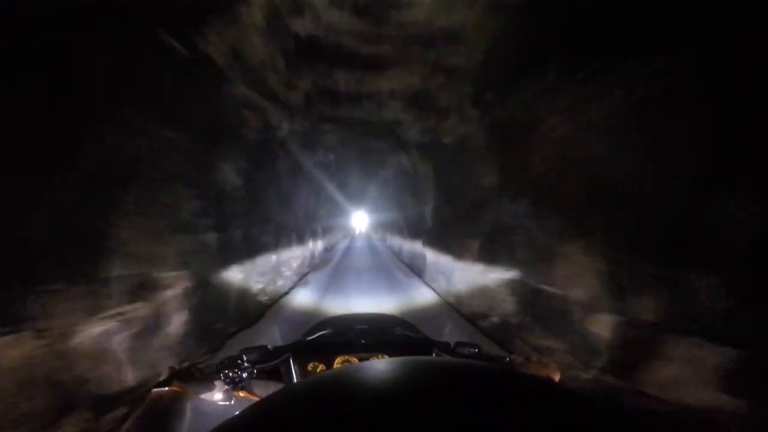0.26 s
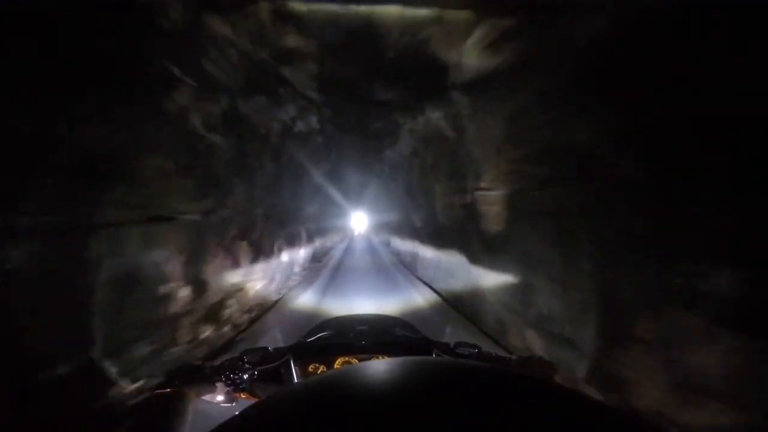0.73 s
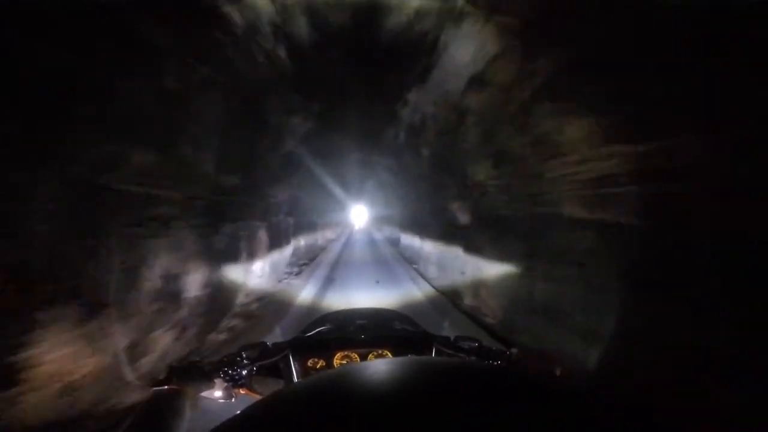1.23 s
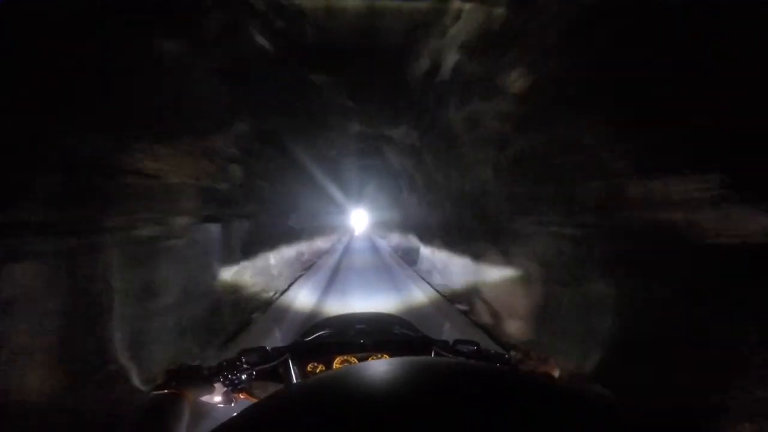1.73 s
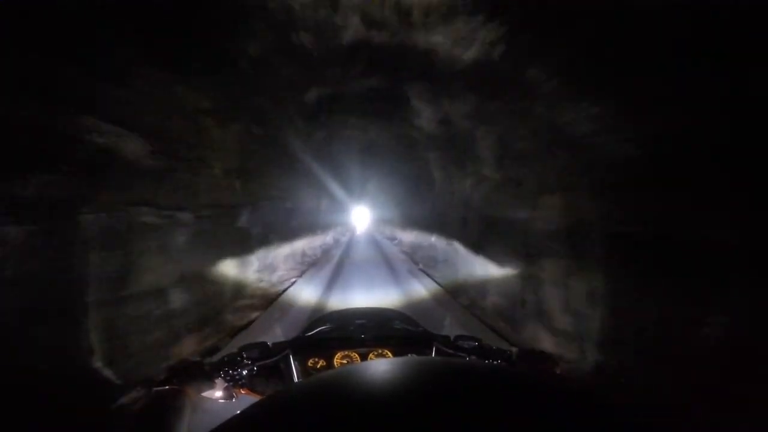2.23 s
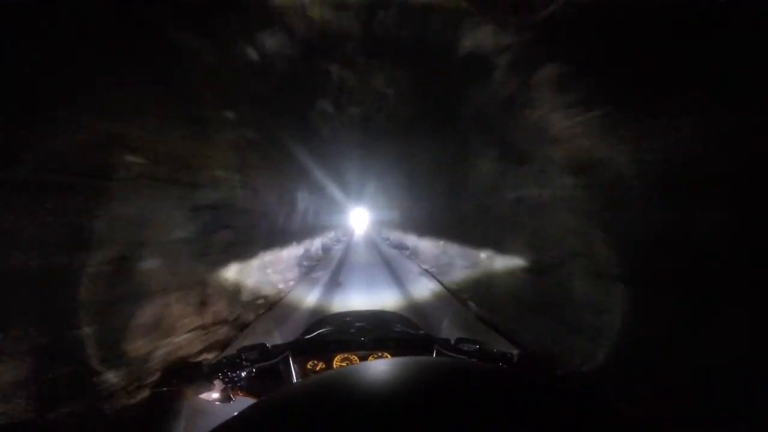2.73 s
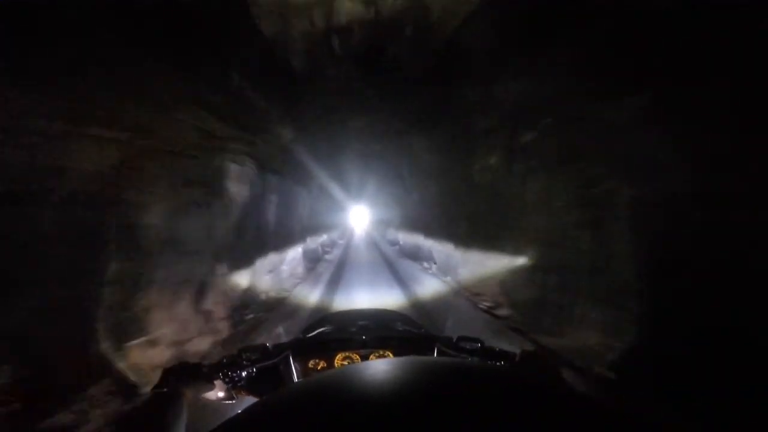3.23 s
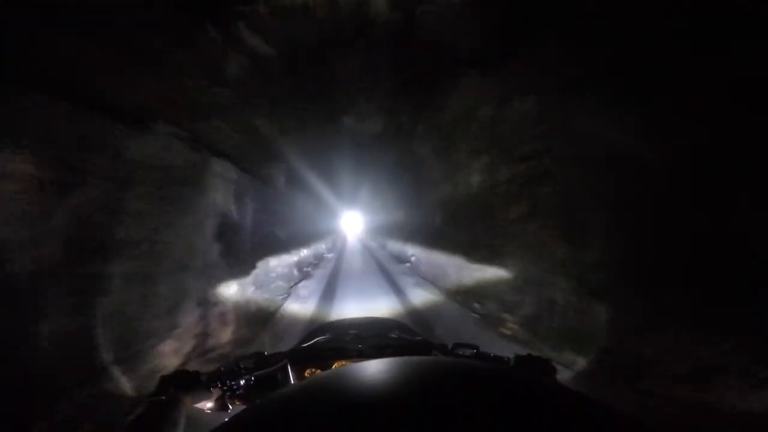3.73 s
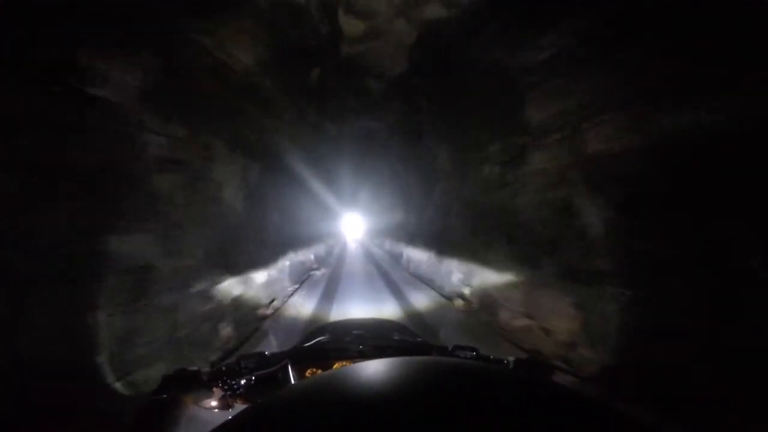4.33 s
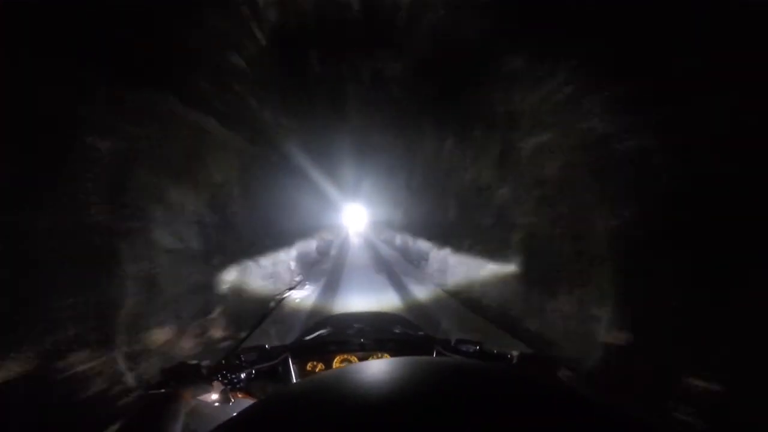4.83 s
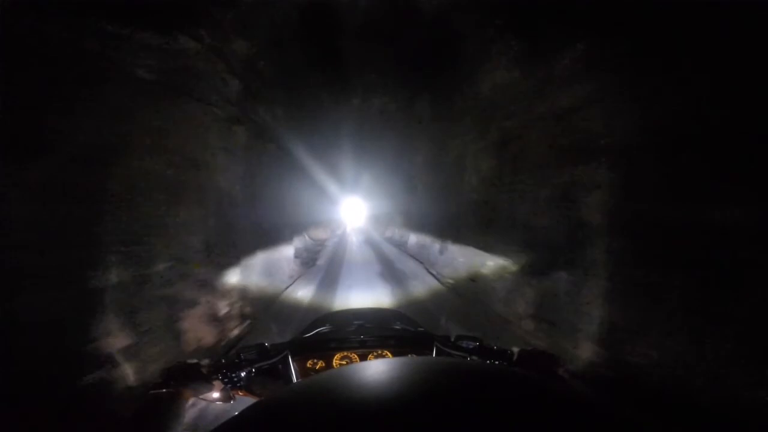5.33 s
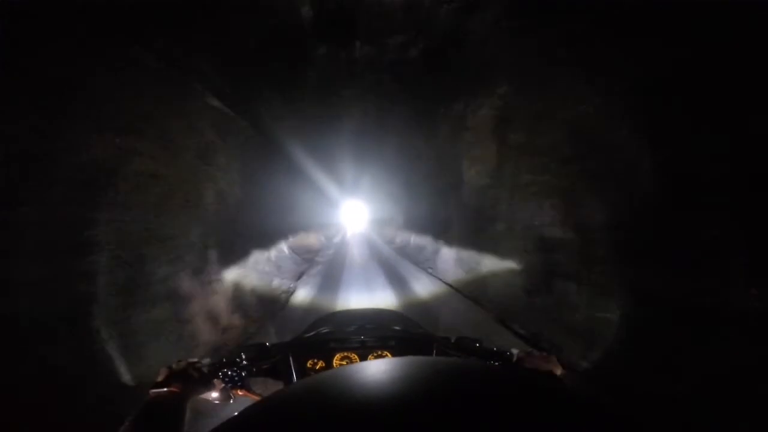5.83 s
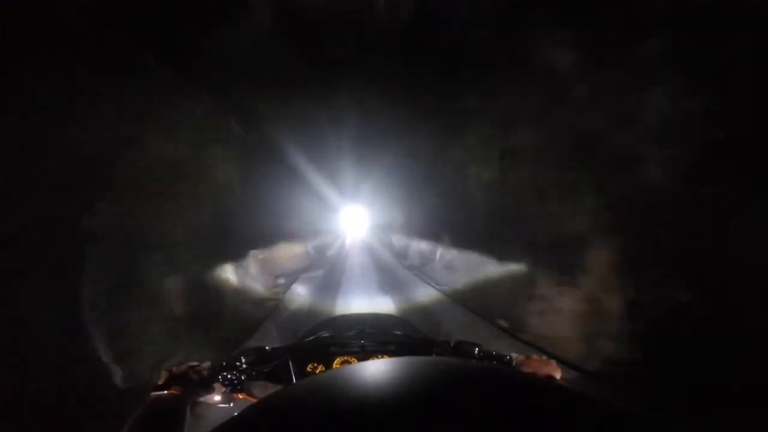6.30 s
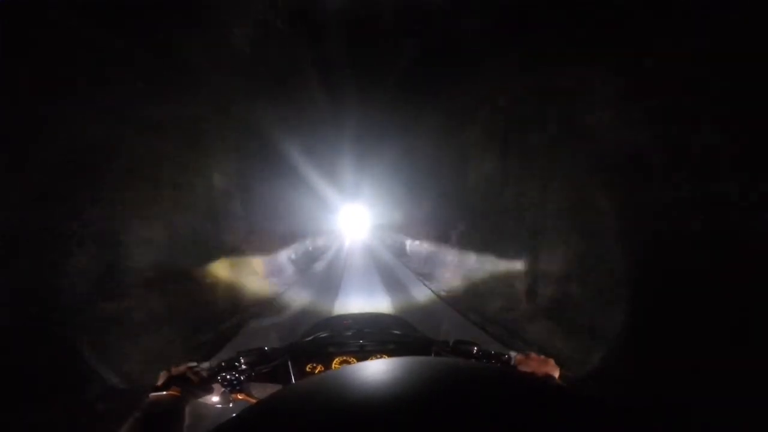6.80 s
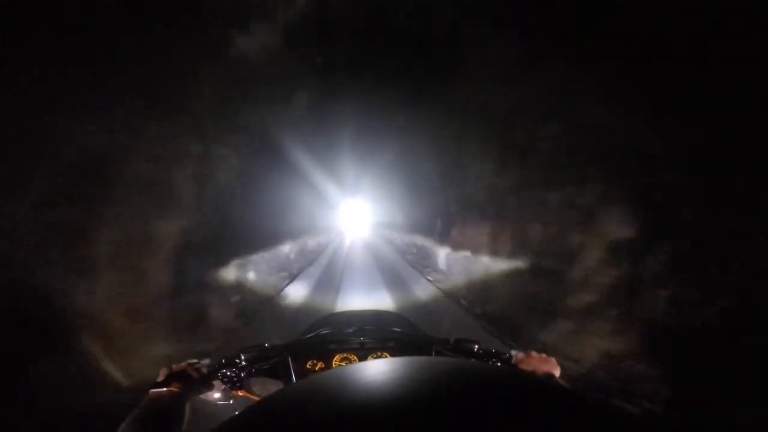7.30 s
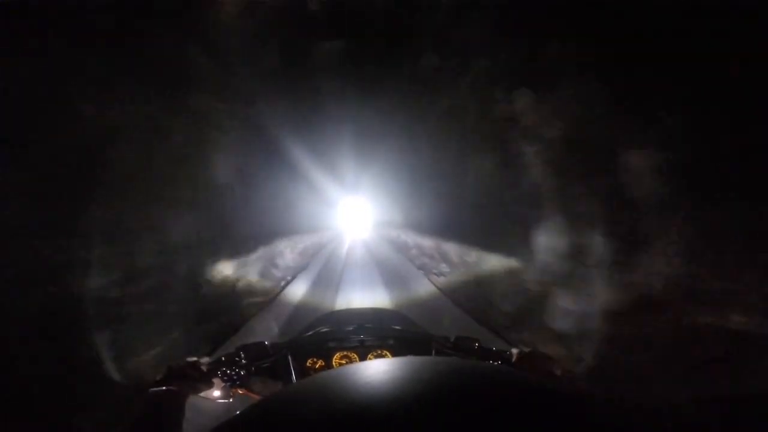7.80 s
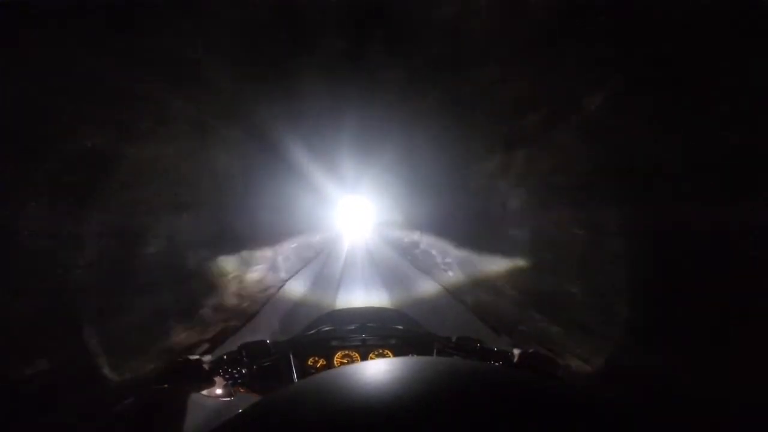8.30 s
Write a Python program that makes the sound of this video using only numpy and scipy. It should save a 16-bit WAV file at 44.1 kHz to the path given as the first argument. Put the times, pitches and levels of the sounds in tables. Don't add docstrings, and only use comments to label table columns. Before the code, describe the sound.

A twin-cylinder motorcycle growls steadily through a narrow rock tunnel, its low boom echoing off rough walls while tyres roar and stones knock underneath.

```python
import sys
import numpy as np
from scipy import signal
from scipy.fft import rfft, irfft, next_fast_len
from scipy.io import wavfile

SR = 44100
rng = np.random.default_rng(int(sys.argv[2]) if len(sys.argv) > 2 else 0)


def log_audio(samples):
    frames = np.atleast_2d(samples).T
    limited = np.clip(frames, -1, 1)
    pcm = np.round(limited * 32767).astype(np.int16)
    wavfile.write(sys.argv[1], SR, pcm)


def how_loud(loudness_db):
    steps = np.asarray(loudness_db, float) / 20
    return 10 ** steps


N = 377055

# pitch in Hz, level in dB per Hz.
AIR_COLOUR = [(2300, -36), (3900, -1.5), (4700, 2.5), (6300, 1), (7020, -5.5), (8220, -19), (9100, -14.5),
              (10000, -18.5), (10500, -17.5), (11900, -23), (12600, -26.5), (14000, -28), (15600, -36)]
# pitch in Hz, level in dB rms.
WHINES = [(8780, -79), (11687, -84), (11719, -82), (14626, -93)]
AIR_DB, AIR_FOLLOWS_ROAD, AIR_GUST_DB = -44.5, 0.35, 0.47

# time in seconds, lift in dB, length in seconds.
HUMS = [
    (3.17, 11, .15),
    (3.547, 10, 0.1),
    (4.05, 10, .2),
    (4.8, 10, 0.47),
    (5.447, 5, 0.14),
    (5.9, 4.5, 0.21),
    (7.4, 3, .3),
    (7.798, 7, 0.068),
]
PANEL_HZ, PANEL_WIDTH_HZ = 597, 59
PANEL_QUIET_DB, PANEL_FLUTTER_DB = -54, 1

# pitch in Hz, level in dB per Hz.
BOOM_COLOUR = [(12, -30), (20, -11), (40, -4.5), (65, -1), (90, 3), (118, 3.5), (140, -0.5), (165, -7.5),
               (200, -10.5), (272, -10.5), (290, -13.5), (315, -23.5), (400, -29.5), (600, -46)]
# mean level in dB, share of the wall echo from 0 to 1,
# lift in the tight stretch in dB, chance drift in dB.
BOOM_PARTS = [
    (-32.5, .2, -2.5, .5),
    (-26.5, 0.7, -0.5, .5),
    (-34, 0.27, 7, .5),
    (-33.5, 0.29, 3.5, .5),
]
# time in seconds, lift in dB, length in seconds.
BUFFETS = [
    (.1, 7, 0.12),
    (.76, 6.5, 0.13),
    (2.19, 6, .2),
    (3.3, 8, .15),
    (3.7, 1, .15),
    (4.062, 8, .12),
    (4.6, 2, 0.33),
    (5.6, 5, .2),
    (7.45, 3, 0.28),
]
# time in seconds, strength of their echo in dB.
WALLS = [(0, -1), (.4, 0.5), (.75, -5.5), (1.2, 1.5), (1.6, -5), (2.2, -1), (2.7, 7.5), (3.3, 2), (3.7, 2),
         (3.9, -0.5), (4.1, 5), (5.1, 1), (5.6, 1), (5.9, -7), (6.9, -2), (7.5, -3.5), (8.0, -1.5),
         (8.55, 4.5)]
NARROWS_S, NARROWS_LENGTH_S = 2.51, 0.64

# time in seconds, peak level in dB, centre pitch in Hz.
KNOCKS = [(1.757, -23, 1520), (2.0847, -21, 1480), (2.5186, -19, 1680), (2.5966, -19, 1580),
          (2.6593, -27, 1540), (2.704, -21, 1460), (2.823, -13.5, 1360), (3.0046, -24, 1430),
          (3.3113, -15, 1550), (3.3862, -20, 1520), (3.515, -20, 1690), (3.746, -26, 902),
          (3.747, -15.5, 1550), (3.8312, -19.5, 1510), (3.9668, -16.5, 1540), (4.217, -17, 1530),
          (4.2847, -19, 1520), (4.4716, -22, 1140), (4.485, -20, 1530), (4.9274, -22, 1440),
          (4.936, -22, 1520), (7.5518, -26, 1780), (7.568, -25, 1530), (7.684, -19, 1590),
          (8.129, -25, 1500), (8.1706, -20, 1480), (8.1762, -20, 1570), (8.309, -24, 1580),
          (8.357, -18, 1640), (8.4737, -22, 1590)]

# pitch in Hz, level in dB per Hz.
TYRE_COLOUR = [(190, -52), (330, -10.5), (426, -5.5), (533, -3), (599, -3), (725, -3), (1030, -4),
               (1290, -3.5), (1530, 3.5), (1990, -7.5), (2550, -12.5), (2960, -10), (3390, -14),
               (3660, -14), (4200, -35), (5460, -20), (9240, -120)]
# mean level in dB, share of the road roughness from 0 to 1,
# share of a stone patch from 0 to 1.
TYRE_PARTS = [
    (-45, 1, 0.96),
    (-41, 0.5, 0.79),
    (-38, 0.5, .25),
]
# time in seconds, lift over a smooth road in dB.
ROAD = [(0, -0.5), (1, 0.8), (2.0, 2), (2.06, 2.5), (2.9, 5), (3.6, 5.5), (4.4, 3), (5.05, 1.5),
        (5.2, -0.3), (6.2, 0), (7, 0.3), (8.55, 2.1)]
# time in seconds, lift in dB, length in seconds, coarseness from 0 to 1.
PATCHES = [(0.29, 6, 0.055, 0.2), (.71, 1.5, 0.3, .1), (2.084, 7.5, .12, 0.9), (2.405, 8, 0.13, .95),
           (2.71, 5.5, 0.033, .5), (2.82, 5.5, 0.092, .95), (3.027, 5, 0.028, 0.7), (3.17, 5, 0.056, .6),
           (3.312, 2, 0.02, .8), (3.475, 2, .08, 0.3), (3.75, 1.5, .06, .5), (4.018, 2, .08, 0.7),
           (4.19, 3, .05, .9), (4.356, 3, .05, 0.8), (4.493, 7, 0.018, .4), (4.93, 5.5, .03, .95),
           (5.27, 5, .1, .05), (5.45, 3, 0.11, .05), (6.91, 4.5, .2, 0.2), (6.6, 3.5, 0.27, 0.1),
           (7.588, 7, 0.095, .05), (8.08, 8, 0.093, .05), (8.315, 6, 0.13, .05)]

# time in seconds, four-stroke cycles per second.
SPEED = [(0.0, 12.34), (0.48, 12.98), (0.95, 13.31), (1.43, 13.62), (1.9, 14.06), (2.38, 14.36),
         (2.85, 14.12), (3.33, 14.08), (3.8, 13.58), (4.28, 13.49), (4.75, 13.27), (5.23, 13.18),
         (5.7, 13.48), (6.18, 13.88), (7.13, 14.37), (7.6, 14.76), (8.08, 14.91), (8.55, 14.96)]
# order (multiple of the cycle), mean level in dB.
STRONG_ORDERS = [(3, -44), (5, -39), (6, -38.5), (7, -35), (8, -38.5), (9, -37), (10, -39.5), (11, -41.5)]
# order (multiple of the cycle), mean level in dB.
FAINT_ORDERS = [(2, -48), (4, -37), (12, -40.5), (14, -44), (18, -51), (19, -44.5)]
# time in seconds, order, peak level in dB, length in seconds.
SWELLS = [(0.02, 5, -26.5, .12), (0.884, 5, -32, 0.15), (1.79, 5, -30.5, 0.17), (4.02, 5, -23.5, 0.097),
          (4.4, 5, -31, .15), (4.98, 5, -34, .11), (5.374, 5, -38, 0.14), (7.425, 5, -11, 0.17),
          (7.644, 5, -20, .09), (8.36, 5, -28.5, 0.47), (0.953, 7, -30, .15), (1.304, 7, -30, 0.1),
          (1.9, 7, -32, .2), (2.975, 7, -28, 0.17), (3.357, 7, -26, 0.33), (4.1, 7, -29, 0.15),
          (4.617, 7, -27.5, 0.33), (5.087, 7, -34, 0.14), (5.416, 7, -33, 0.35), (7.92, 7, -33, 0.23),
          (0.086, 8, -22.5, 0.087), (1.154, 8, -23.5, 0.1), (1.793, 8, -24, 0.066), (3.0, 8, -22, 0.17),
          (8.415, 8, -27, 0.19), (0.3, 9, -24, 0.42), (2.457, 9, -22.5, .19), (3.675, 9, -18, .19),
          (7.146, 9, -23.5, .11), (3.75, 3, -30, 0.25)]
# time in seconds, order, peak level in dB, length
# in seconds.
MORE_SWELLS = [(4.1, 3, -31, .15), (4.62, 3, -33, 0.12), (5.15, 3, -37, 0.18), (.6, 6, -30, 0.4),
               (1.65, 6, -37, .2), (2.6, 6, -28, .15), (3.6, 6, -30, 0.22), (5.5, 6, -33, 0.12),
               (6.33, 6, -32, 0.22), (.95, 10, -28, 0.19), (1.29, 10, -30, 0.16), (1.4, 10, -29, 0.14),
               (5.4, 10, -30, .13), (5.9, 10, -32, 0.22), (7.95, 9, -29.5, 0.1), (0.33, 11, -29, 0.32),
               (4.62, 11, -35, 0.1), (6.7, 11, -30.5, 0.11), (2.05, 9, -28, 0.081), (5.61, 9, -27.5, .1),
               (6.3, 9, -30.5, 0.22), (7.8, 9, -27, 0.13), (7.22, 5, -24, 0.09), (2.09, 8, -24.5, 0.079)]
ORDER_FADE_DB, ORDER_FADE_RATE, ORDER_FOLLOWS_WALLS = 1.5, 1.6, 0.3
ECHO_FLUTTER_DB, ECHO_FLUTTER_RATE, PHASE_WANDER = 0.8, 8.0, 0.15

SWELL_RISE, PATCH_RISE = 0.78, 0.39

# pitch in Hz, width in Hz, share removed from 0 to 1.
HOUSING_DIPS = [(3406, 120, 0.68), (3970, 180, 0.08), (5240, 850, 0.39), (10940, 500, 0.44),
                (14450, 500, .4)]
FADE_S = 0.0015


def rms_one(x):
    return x / np.sqrt(np.mean(x ** 2) + 1e-20)


def in_time(rows):
    s, *columns = np.transpose(rows)
    return [np.interp(np.arange(N) / SR, s, column) for column in columns]


def drift(rate):
    r = np.exp(-80 * np.pi * rate / SR)
    noise = rng.standard_normal(N // 40 + 2002)
    slow = signal.lfilter([1], [1, -2 * r, r * r], noise)[2000:]
    return np.interp(np.arange(N) / 40, np.arange(len(slow)), rms_one(slow))


def bump(s, length_s, rise):
    bell = np.zeros(N)
    t = np.arange(N) / SR - s
    near = slice(*np.searchsorted(t, [-4 * length_s, 4 * length_s]))
    side = np.where(t[near] < 0, rise, 1)
    bell[near] = np.exp(-(t[near] / (length_s * side)) ** 2)
    return bell


def resonance(x, hz, width_hz):
    r = np.exp(-np.pi * width_hz / SR)
    ring = [1, -2 * r * np.cos(2 * np.pi * hz / SR), r * r]
    return signal.lfilter([(1 - r * r) / 2, 0, (r * r - 1) / 2], ring, x)


def noise_parts(colour, splits, patchy_db, rate):
    size = next_fast_len(N)
    hz = np.maximum(np.arange(size // 2 + 1) * SR / size, 1)
    colour_hz, colour_db = np.transpose(colour)
    shape_db = np.interp(np.log(hz), np.log(colour_hz), colour_db, -120, -120)
    whole = rfft(rng.standard_normal(size)) * how_loud(shape_db)
    above = [1] + [1 / (1 + (edge / hz) ** 16) for edge in splits] + [0]
    parts = [irfft(whole * (a - b), size)[:N] for a, b in zip(above, above[1:])]
    return [rms_one(part * how_loud(patchy_db * drift(rate))) for part in parts]


def air():
    low, high = noise_parts(AIR_COLOUR, [7800], patchy_db=0.75, rate=24)
    low_db = AIR_DB + AIR_FOLLOWS_ROAD * in_time(ROAD)[0] + AIR_GUST_DB * drift(1.9)
    high_db = AIR_DB - 15.0 + 0.75 * drift(4)
    out = how_loud(low_db) * low + how_loud(high_db) * high
    t = np.arange(N) / SR
    for hz, db in WHINES:
        out = out + np.sqrt(2) * how_loud(db) * np.sin(2 * np.pi * hz * t + 0.8 * drift(6))
    return out


def panel():
    shake = resonance(rng.standard_normal(N), PANEL_HZ, PANEL_WIDTH_HZ)
    hum = rms_one(resonance(shake, PANEL_HZ, PANEL_WIDTH_HZ))
    bumps_db = sum(db * bump(s, length_s, SWELL_RISE) for s, db, length_s in HUMS)
    return how_loud(PANEL_QUIET_DB + bumps_db + PANEL_FLUTTER_DB * drift(3.6)) * hum


def boom():
    parts = noise_parts(BOOM_COLOUR, [65, 150, 220], patchy_db=0.66, rate=4.7)
    buffets_db = sum(db * bump(s, length_s, SWELL_RISE) for s, db, length_s in BUFFETS)
    parts[0] = parts[0] * how_loud(buffets_db)
    walls_db = in_time(WALLS)[0]
    narrows = bump(NARROWS_S, NARROWS_LENGTH_S, rise=0.98)
    out = np.zeros(N)
    for (db, echo, tight_db, chance_db), part in zip(BOOM_PARTS, parts):
        out += how_loud(db + echo * walls_db + tight_db * narrows + chance_db * drift(1.9)) * part
    return out


def knocks():
    out = np.zeros(N)
    t = np.arange(1500) / SR
    muffle = signal.butter(4, 3800, fs=SR, output="sos")
    for s, peak_db, hz in KNOCKS:
        scratch = rng.standard_normal(len(t)) * np.exp(-t / 0.0051)
        scratch = signal.sosfilt(muffle, scratch)
        knock = resonance(scratch, hz, 290) - 0.37 * resonance(scratch, 3100, 600)
        at = round(s * SR)
        out[at:at + len(t)] += how_loud(peak_db - 3.0) * knock / np.abs(knock).max()
    return out


def tyres():
    parts = noise_parts(TYRE_COLOUR, [1300, 2000], patchy_db=0.85, rate=13.0)
    road_db = in_time(ROAD)[0]
    coarse_db, stone_db = np.zeros(N), np.zeros(N)
    for s, db, length_s, coarseness in PATCHES:
        lift_db = db * bump(s, length_s, PATCH_RISE)
        stone_db += lift_db
        coarse_db += coarseness * lift_db
    out = np.zeros(N)
    for (db, rough, share), lift_db, part in zip(TYRE_PARTS, (coarse_db, stone_db, stone_db), parts):
        out += how_loud(db + rough * road_db + share * lift_db) * part
    return how_loud(0.39 * drift(24)) * out


def order_tone(turns, order, level, wobble):
    phase = 2 * np.pi * (order * turns + rng.random()) + wobble * drift(2.0)
    return np.sqrt(2) * level * np.sin(phase)


def engine():
    turns = np.cumsum(in_time(SPEED)[0]) / SR
    walls_db = in_time(WALLS)[0]
    out = np.zeros(N)
    for order, db in STRONG_ORDERS:
        level = how_loud(db + ORDER_FOLLOWS_WALLS * walls_db + ORDER_FADE_DB * drift(ORDER_FADE_RATE))
        for s, swelling_order, peak_db, length_s in [*SWELLS, *MORE_SWELLS]:
            if round(swelling_order) == round(order):
                level += how_loud(peak_db) * bump(s, length_s, SWELL_RISE)
        flutter = how_loud(ECHO_FLUTTER_DB * drift(ECHO_FLUTTER_RATE))
        out += order_tone(turns, round(order), level * flutter, PHASE_WANDER)
    for order, db in FAINT_ORDERS:
        out += order_tone(turns, order, how_loud(db + 2.4 * drift(0.87)), wobble=0.45)
    return out


def scene():
    return (air() + panel() + boom() + knocks() + tyres() + engine())[None, :]


def roll_off(x):
    return signal.sosfilt(signal.butter(12, 15200, fs=SR, output="sos"), x)


def record(dry):
    from_start = np.arange(N)
    to_nearest_end_s = np.minimum(from_start, from_start[::-1]) / SR
    mix = dry * np.minimum(to_nearest_end_s / FADE_S, 1)
    for hz, width_hz, share in HOUSING_DIPS:
        mix = mix - np.clip(share, 0, 1) * resonance(mix, hz, width_hz)
    return roll_off(mix)


dry = scene()
out = record(dry)
log_audio(out)
```